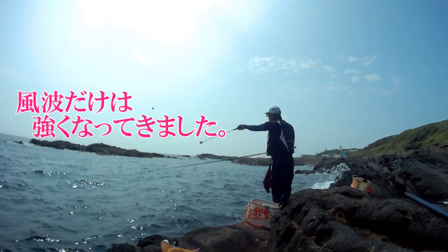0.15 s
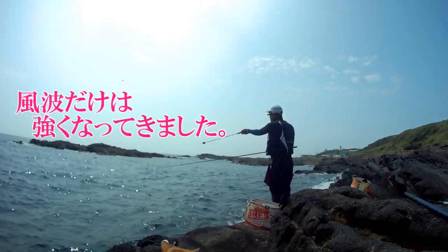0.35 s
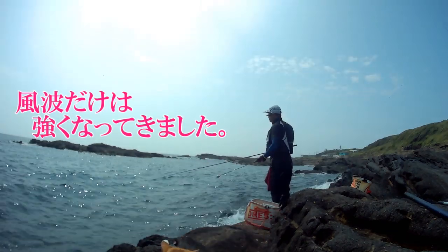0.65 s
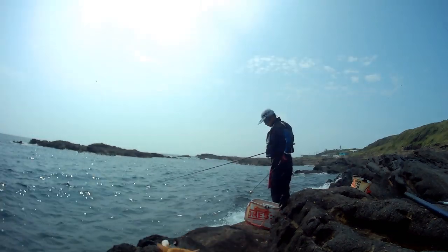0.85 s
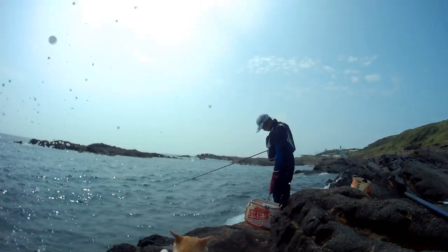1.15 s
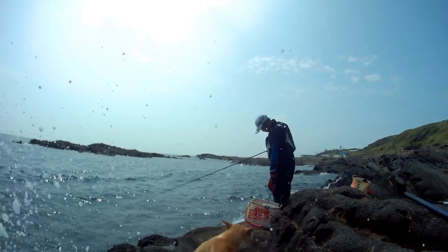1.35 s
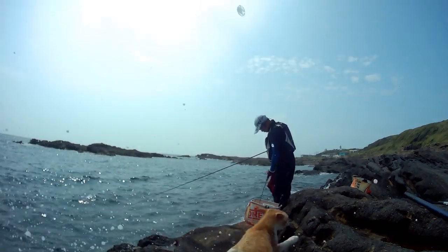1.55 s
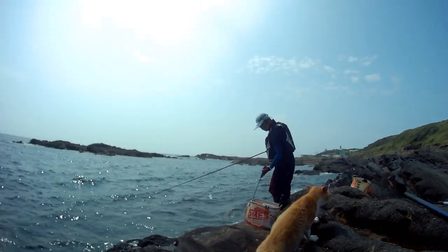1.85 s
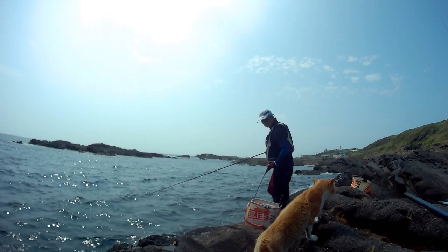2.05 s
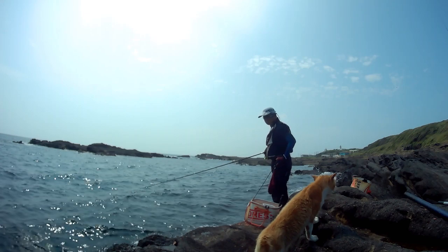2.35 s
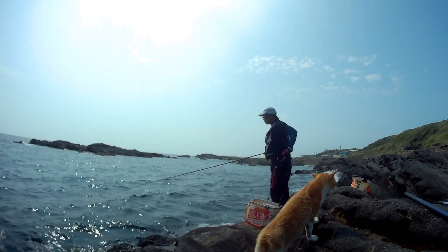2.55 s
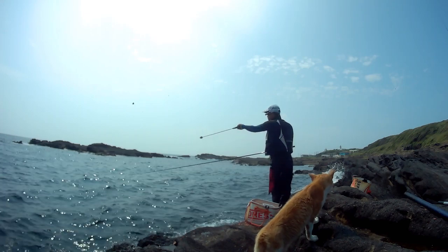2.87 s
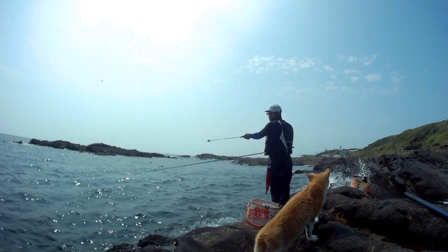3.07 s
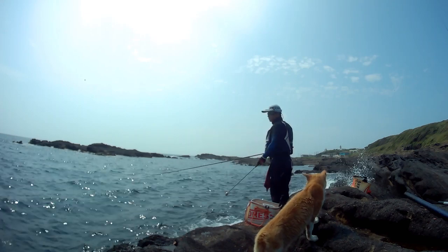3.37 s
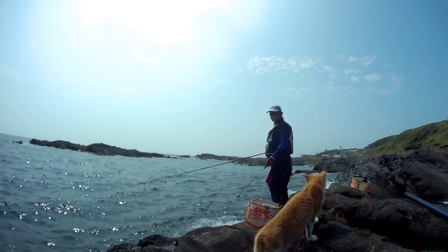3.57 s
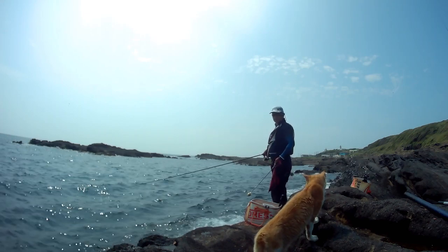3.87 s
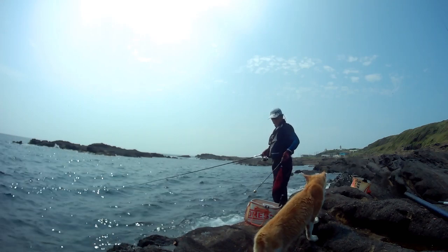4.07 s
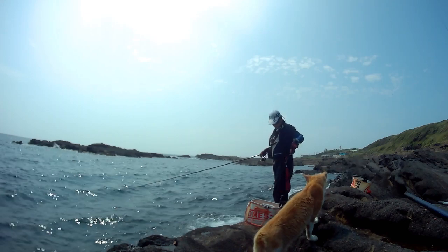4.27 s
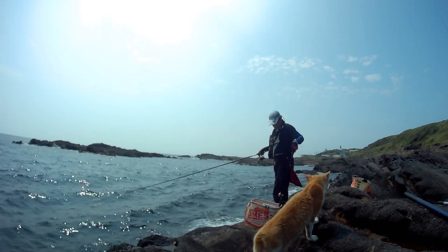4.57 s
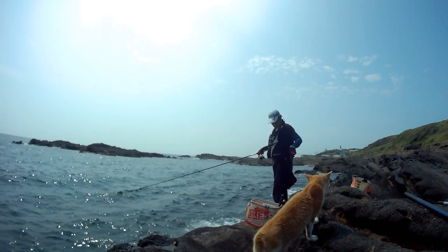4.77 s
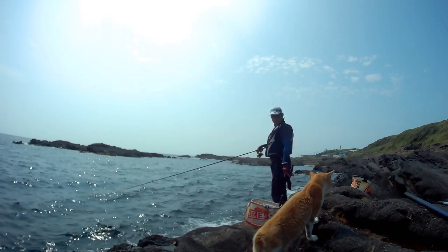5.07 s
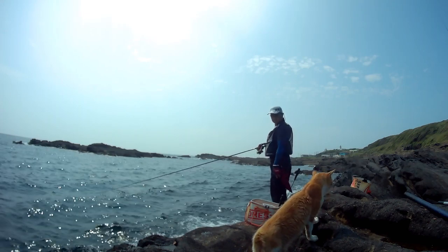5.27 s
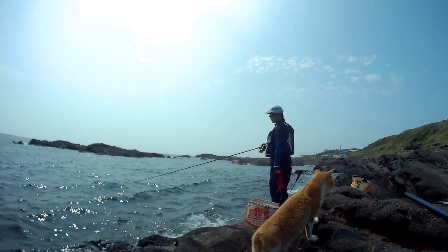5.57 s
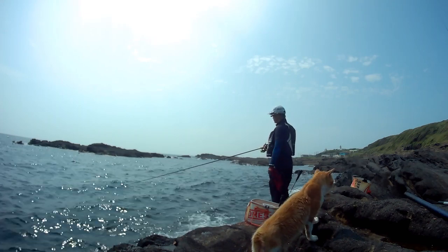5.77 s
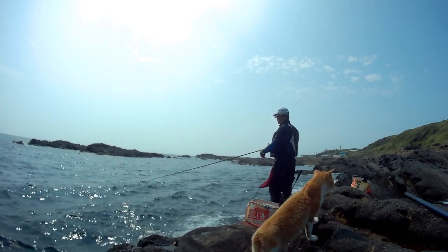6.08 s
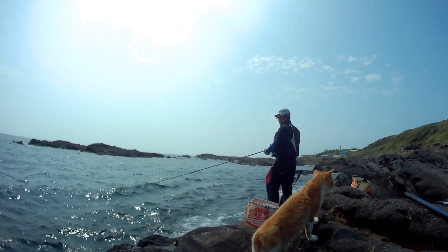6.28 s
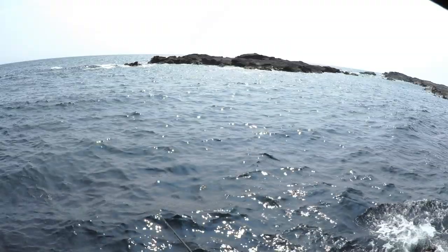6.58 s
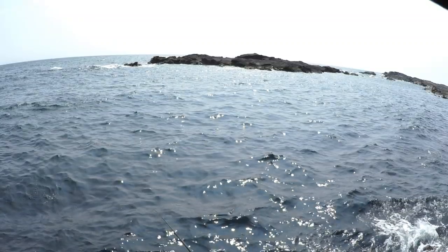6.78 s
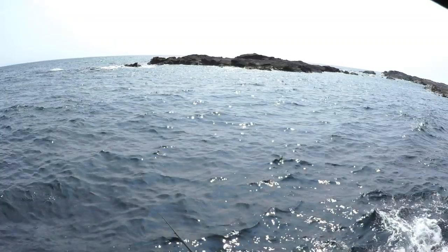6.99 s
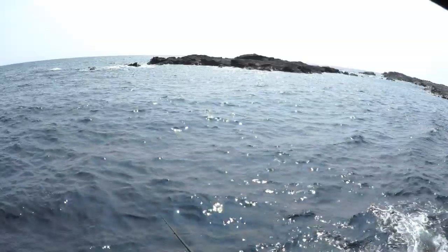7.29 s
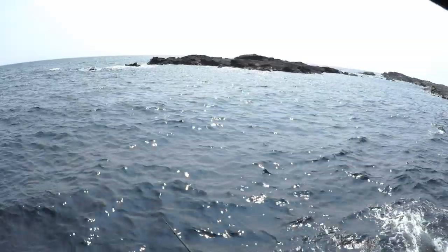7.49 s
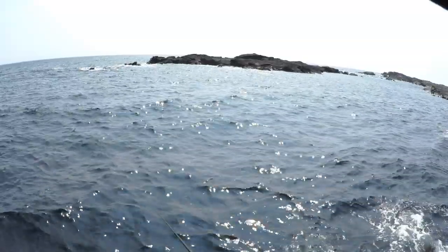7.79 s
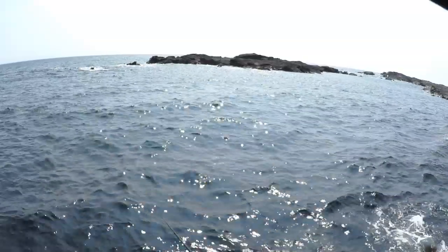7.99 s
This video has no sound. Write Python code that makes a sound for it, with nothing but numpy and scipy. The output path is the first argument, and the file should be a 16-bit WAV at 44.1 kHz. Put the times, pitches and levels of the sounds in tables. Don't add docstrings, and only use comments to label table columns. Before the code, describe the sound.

Outdoor surf on a rocky shore, heard close. From 0 s a wave washes and churns over rocks, muffled in the treble, with light low wind buffeting the microphone. Slaps land around 0.5 s, and a tight, crackling cluster strikes loudest near 1.1 s. Spray patters around 1.6 and 2 s, with short plops and bright drop ticks at about 1.1, 1.4, 1.6, 2.0 and 2.2 s. From 2.5 s the water drains into a softer, uneven wash with hollow thuds, small drops near 3.7 to 4.1 s and occasional light slaps. From 5 s everything fades steadily, reaching silence near 6.6 s. A second spot then slowly fades in: thin, bassless foam fizzing close by, with bubbly texture, tiny slaps and faint drops, still rising at 8 s with a clearer drop.

```python
import sys
import numpy as np
from scipy import signal
from scipy.fft import rfft, irfft
from scipy.io import wavfile
from scipy.ndimage import uniform_filter1d

SR = 44100
rng = np.random.default_rng(int(sys.argv[2]) if len(sys.argv) > 2 else 0)


def level_to_linear(level):
    exponent = np.asarray(level, float) / 20
    return 10 ** exponent


def bounce(signal):
    frames = np.transpose(np.atleast_2d(signal))
    limited = np.clip(frames, -1, 1)
    pcm = np.round(limited * 32767).astype(np.int16)
    wavfile.write(sys.argv[1], SR, pcm)


N = 358974
TIME = np.arange(N) / SR
HZ = np.fft.rfftfreq(N, 1 / SR)
CUT_S = 6.605


def evened(x):
    return x / np.sqrt(np.mean(x ** 2) + 1e-20)


def drift(low_hz, high_hz):
    keep = (HZ > low_hz) & (HZ < high_hz)
    spectrum = rfft(rng.standard_normal(N)) * keep / np.sqrt(HZ + 1)
    return evened(irfft(spectrum, N))


def swells(rows):
    t = TIME[::64]
    bumps_db = np.zeros(len(t))
    for s, db, rise_s, fall_s in rows:
        side_s = np.where(t < s, rise_s, fall_s).clip(1e-3)
        bumps_db += db * np.exp(-((t - s) / side_s) ** 2)
    return np.interp(TIME, t, bumps_db)


def housing(colour, modes):
    f, colour_db = np.transpose(colour)
    bumps_db = sum(db * np.exp(-((HZ - hz) / width) ** 2) for hz, width, db in modes)
    return level_to_linear(np.interp(np.log(HZ + 1), np.log(f + 1), colour_db) + bumps_db)


def near_housing():
    # frequency in Hz, level in dB per Hz.
    colour = [(24, -17.5), (59, -3), (237, -4), (292, -0.5), (600, -0.6), (921, -3), (1260, -1.38),
              (2300, -17), (3400, -22), (3980, -20.5), (5300, -26.5), (6050, -28), (8490, -36.5),
              (11600, -34.5), (15500, -48)]
    # centre in Hz, width in Hz, gain in dB.
    modes = [(1655, 410, 2.5), (2290, 150, -2), (2750, 120, 3), (3540, 300, -3), (5260, 220, -4.5),
             (6000, 550, 3), (9400, 400, 1), (12100, 500, 1.5), (13300, 600, -4)]
    return housing(colour, modes)


def far_housing():
    # frequency in Hz, level in dB per Hz.
    colour = [(20, -44), (60, -36), (129, -52.5), (359, -9.7), (975, -0.2), (1830, -4.5), (3190, -15),
              (4120, -20.5), (4630, -27), (5700, -38.5), (6560, -22.5), (8080, -32.5), (9730, -16.5),
              (12900, -39.5), (15500, -27.5)]
    # centre in Hz, width in Hz, gain in dB.
    modes = [(167, 36, 7), (4570, 120, -10), (4900, 300, -2), (5700, 110, -15), (125, 40, 14),
             (10340, 350, 3.5), (7340, 400, 3), (11200, 500, -2.5), (14300, 600, -2)]
    return housing(colour, modes)


def layer_shares():
    edges_hz = (250, 800, 2300, 6500)
    below = [1 / (1 + (HZ / hz) ** 6) for hz in edges_hz]
    shares = np.diff([0 * HZ, *below, 1 + 0 * HZ], axis=0)
    return np.sqrt(shares.clip(0))


def patchy_noise(patchy_db):
    real, imag, patches = rng.standard_normal((N // 128 + 5, 257, 3)).T
    patches = uniform_filter1d(patches, size=7, axis=0)
    patches = evened(uniform_filter1d(patches, size=24, axis=1))
    spectrum = (real + 1j * imag) * level_to_linear(patchy_db * patches)
    return evened(signal.istft(spectrum, nperseg=512, noverlap=384)[1][:N])


def bubbles(low_hz, high_hz, cycles, per_s, spread_db, count=16):
    bursts = rng.random(N) < per_s / SR
    size = bursts * level_to_linear(spread_db * np.minimum(rng.exponential(1, N), 4))
    kind = rng.integers(0, count, N)
    out = np.zeros(N)
    for k, hz in enumerate(np.geomspace(low_hz, high_hz, count)):
        turns = np.arange(400) * hz / SR
        ring = turns * np.exp(-3 * turns / cycles) * np.sin(2 * np.pi * turns * (1 + 0.023 * turns))
        out += signal.oaconvolve(size * (kind == k), hz * ring)[:N]
    return evened(out)


def slap_gains():
    # time in seconds, roar gain in dB, spray gain in dB, length in seconds.
    slaps = [(0.21, 1.5, 0.5, .02), (0.495, 5.5, 2, 0.015), (0.588, 3, 4.5, 0.013), (0.774, 1, 1, 0.026),
             (1.02, -1, 2.5, 0.048), (1.075, 7.5, 3, 0.01), (1.092, 5, 1, 0.0071), (1.115, 1, 1.5, 0.0031),
             (1.142, 6, -2.5, 0.0053), (1.173, 4, 0, 0.0094), (1.188, -3.5, -2.5, .015),
             (1.452, -4, 2, 0.013), (1.502, -5, 4.5, 0.011), (1.36, 2.5, 2.5, .01), (1.582, 1, 1, 0.03),
             (1.624, 2, 1.5, 0.017), (1.987, 6, -2, .006), (3.956, 2.5, -1, 0.01), (4.508, 3, 4, .01),
             (4.998, 1.5, -1.5, 0.016), (5.76, 2, 2, 0.036), (6.739, 7, 3.5, 0.0087), (6.787, 5, 2, .008),
             (6.94, -3, 1.5, .01), (7.076, 6, 1, 0.01), (7.303, 4, 1.5, 0.016), (7.633, -2, -3.5, 0.048),
             (7.96, 2, 1.5, 0.022)]
    roar_db = swells((s, roar, length, length / 1.47) for s, roar, _, length in slaps)
    spray_db = swells((s, spray, length, length / 1.47) for s, _, spray, length in slaps)
    return roar_db, spray_db


def surf(wave, follow, gain, pops, fizzles, foam, fizz, gust_db, churn_db, flicker_db, patchy_db=1.5):
    # peak in seconds, level in dB, rise and fall in seconds.
    showers = [(.45, 1.5, .15, 0.12), (1.07, 1.5, 0.071, 0.083), (1.58, 4, 0.43, 0.21),
               (2.05, 4, 0.39, 0.1), (2.5, 0.5, 0.15, .2), (3.85, 0.5, 0.13, 0.091), (5.3, -1, 0.14, 0.19),
               (5.85, 1.5, 0.17, 0.31), (6.95, 0.5, .1, .1), (7.4, 0.5, .15, 0.13), (7.95, 0, .2, 0.16)]
    # peak in seconds, level in dB, rise and fall in seconds.
    thuds = [(.5, 2.5, .1, .1), (.78, 2, 0.11, 0.18), (1.58, -0.2, 0.069, 0.087), (2.1, 0.8, 0.17, .2),
             (3.2, 3, .1, .12), (4.35, 2.5, 0.041, .1), (4.68, -1.5, .1, 0.12), (5.0, 3, 0.24, 0.057),
             (5.3, -1, .05, .1), (6.35, -4, .2, 0.17), (6.93, 3, .1, .08), (7.27, 7, 0.13, 0.14)]
    # peak in seconds, level in dB, rise and fall in seconds.
    gusts = [(.4, 8, .1, .15), (.78, 3.5, 0.14, 0.12), (1.02, 6, 0.13, 0.033), (1.78, 4, .12, 0.12),
             (2.3, 2.5, 0.088, 0.26), (2.75, 2, 0.17, 0.22), (3.2, 5, 0.11, 0.13), (3.9, 2.5, 0.088, .1),
             (4.55, 0.5, .2, 0.11), (5.0, 4, 0.2, .1), (5.5, 3, 0.1, 0.08), (6.4, 0, 0.11, .1),
             (6.93, 3, .05, .05), (7.27, 2, .1, .08), (7.9, 2, .1, 0.12)]
    lift_db = -3.5

    s, wave_db = np.transpose(wave)
    mean_db = np.interp(np.linspace(s[0], s[-1], num=200), s, wave_db).mean()
    swing_db = np.interp(TIME, s, wave_db) - mean_db
    wind_db, boom_db, spray_db, mist_db = np.outer(follow, swing_db)
    slap_roar_db, slap_spray_db = slap_gains()
    splash_db = swells(showers) + slap_spray_db
    shake_db = churn_db * drift(4.4, 20) + flicker_db * drift(20, 250)

    wash = patchy_noise(patchy_db)
    roar = np.sqrt(1 - foam) * wash + np.sqrt(foam) * pops
    spray = np.sqrt(1 - fizz) * wash + np.sqrt(fizz) * fizzles
    layers = [wash * level_to_linear(wind_db + swells(gusts) + gust_db * drift(3, 45)),
              wash * level_to_linear(boom_db + swells(thuds) + 0.14 * slap_roar_db + 0.79 * shake_db),
              roar * level_to_linear(swing_db + slap_roar_db + 0.43 * shake_db),
              spray * level_to_linear(spray_db + splash_db + shake_db),
              spray * level_to_linear(mist_db + 1.39 * splash_db + shake_db)]
    spectrum = (rfft(layers) * layer_shares()).sum(0)
    heard = irfft(spectrum * gain, N)
    roar_share = np.sqrt(np.mean((gain * (HZ > 800) * (HZ < 2200)) ** 2))
    return heard / roar_share * level_to_linear(mean_db + lift_db)


def treble_dropouts(x):
    # frequency in Hz, threshold over the local level in dB.
    threshold = [(6000, -21), (8500, -11.5), (12300, -4.5), (12900, -2), (15500, 0)]
    hz, t, z = signal.stft(x, SR, nperseg=2048)
    power = uniform_filter1d(abs(z) ** 2, size=32, axis=0)
    local = np.sqrt(uniform_filter1d(power, size=5, axis=1).clip(0))
    wander = rng.standard_normal((len(hz) // 12 + 1, len(t)))
    wander = evened(uniform_filter1d(wander, size=2, axis=1))
    threshold_db = np.interp(hz, *np.transpose(threshold), left=-60)[:, None]
    threshold_db = threshold_db + 5.0 * np.repeat(wander, 12, axis=0)[:len(hz)]
    audible = abs(z) > local * level_to_linear(threshold_db)
    return signal.istft(z * audible, SR, nperseg=2048)[1][:N]


def far_surf(gain, pops, fizzles):
    # time in seconds, roar level in dB.
    wave = [
        (6.6, -29.5),
        (6.8, -28.5),
        (7.0, -28),
        (7.15, -31.5),
        (7.4, -31.5),
        (7.6, -32),
        (7.8, -33),
        (8.14, -31.5),
    ]
    follow = (.7, 1.9, 0.16, .3)
    return surf(wave, follow, gain, pops, fizzles, foam=0.1, fizz=0.25,
                gust_db=-3.0, churn_db=0.85, flicker_db=-0.1)


def near_surf(gain, pops, fizzles):
    # time in seconds, roar level in dB.
    wave = [(0, -28.5), (.08, -30.5), (.2, -27.5), (.4, -28.5), (.55, -27.5), (.68, -27), (.82, -26.5),
            (.99, -29.5), (1.09, -25), (1.22, -27.5), (1.55, -27.5), (1.9, -31), (2.37, -29.5),
            (2.63, -31.5), (3.4, -33.5), (3.9, -33), (4.3, -34.6), (5.15, -34.5)]
    follow = (0.43, 0.8, 0.74, 1.1)
    drain_db_per_s = 3
    last_s, last_db = wave[-1]
    wave = [*wave, (CUT_S, last_db - drain_db_per_s * (CUT_S - last_s))]
    near = surf(wave, follow, gain, pops, fizzles, foam=0.08, fizz=0.17,
                gust_db=0.4, churn_db=0.7, flicker_db=0.22)
    return treble_dropouts(near)


def drops(near_gain, far_gain):
    # time in seconds, peak in
    # dB, pitch in Hz, length in cycles.
    drop_ticks = [
        (1.115, -11, 1500, 6.8),
        (1.589, -15, 1290, 3.3),
        (1.977, -15, 1370, 3.5),
        (3.79, -23, 1290, 3.7),
        (6.785, -47, 850, 4.0),
        (7.767, -27, 1050, 3),
                  (1.4137, -24, 2750, 5.0),
        (1.5274, -30, 2800, 5.0),
        (4.0986, -37, 2440, 5.0),
        (6.7361, -42, 2320, 5.4),
        (7.0813, -39, 2210, 5.0),
        (7.4116, -44, 2420, 5.0),
        (7.9754, -26, 2520, 5.0),
                  (0.2354, -31, 6160, 6.0),
        (0.9078, -37, 5800, 6.0),
        (3.3752, -37, 6410, 6.0),
        (4.1614, -52, 5540, 6.0),
        (6.9137, -55, 6640, 6.0),
                  (1.066, -39, 11500, 12.0), (1.640, -24, 4150, 10.0), (1.748, -28, 3600, 4.0),
                  (2.021, -23, 7000, 3.4), (2.107, -41, 11300, 25.0), (2.209, -20, 2670, 3.5),
                  (2.209, -18, 1500, 3), (2.2095, -27, 4500, 7.0), (2.207, -38, 11000, 8.0),
                  (3.706, -32, 6800, 3.0), (3.734, -26, 3200, 2.6), (5.604, -44, 5600, 24.0),
                  (6.94, -52, 14800, 6.0), (7.303, -45, 10200, 8.0), (7.327, -33, 3300, 4.0),
                  (7.788, -41, 14800, 8.0)]
    out = np.zeros(N)
    for s, db, hz, cycles in drop_ticks:
        turns = np.arange(1024) * hz / SR
        decay = turns / cycles * 4
        tick = decay * np.exp(1 - decay) * np.sin(2 * np.pi * turns)
        gain = np.interp(np.fft.rfftfreq(1024, 1 / SR), HZ, near_gain if s < CUT_S else far_gain)
        tick = irfft(rfft(np.roll(tick, 256)) * np.sqrt(gain))
        at = round(s * SR) - 256
        out[at:at + 1024] += level_to_linear(db) * tick / abs(tick).max()
    return out


def scene():
    fade_out_s, fade_in_s = 1.6, 2.0
    near_gain, far_gain = near_housing(), far_housing()
    pops = bubbles(492, 2560, cycles=4.8, per_s=1500, spread_db=2.5)
    fizzles = bubbles(2190, 15200, cycles=2.8, per_s=3000, spread_db=2.0)
    near = near_surf(near_gain, pops, fizzles)
    far = far_surf(far_gain, pops, fizzles)
    fade_out = np.clip((CUT_S - TIME) / fade_out_s, 0, 1)
    fade_in = np.clip((TIME - CUT_S) / fade_in_s, 0, 1)
    mix = near * fade_out + far * fade_in + drops(near_gain, far_gain)
    return mix[None]


def top_cut(x):
    return signal.sosfilt(signal.butter(12, 15725, fs=SR, output="sos"), x)


def record(dry):
    return top_cut(dry)


dry = scene()
out = record(dry)
bounce(out)
```